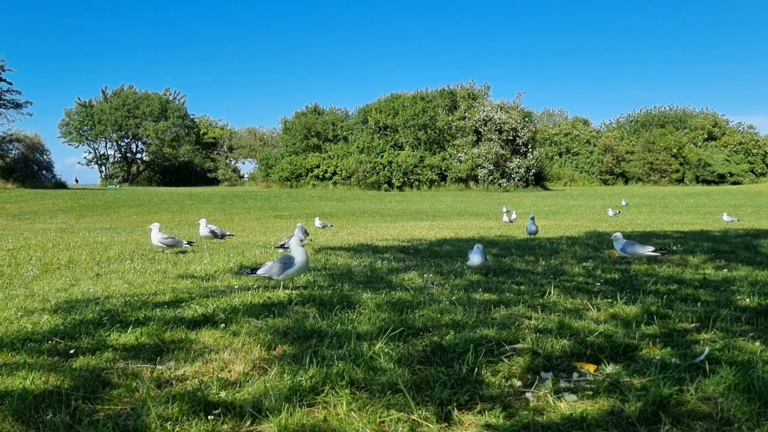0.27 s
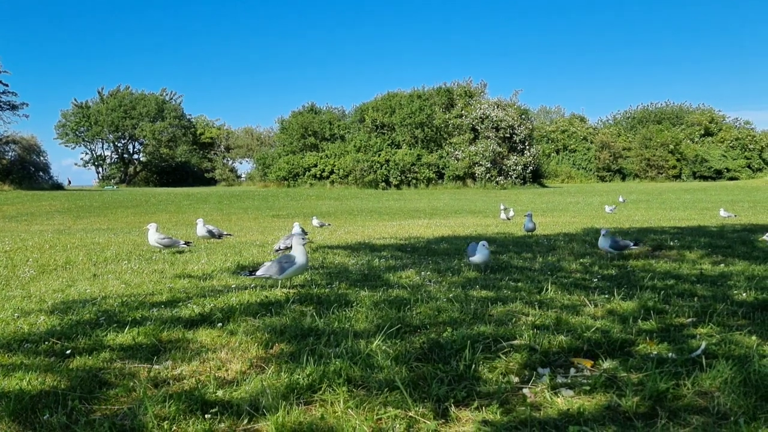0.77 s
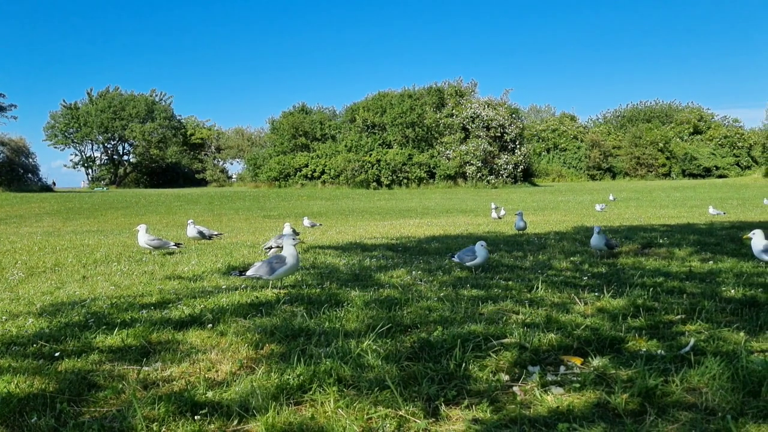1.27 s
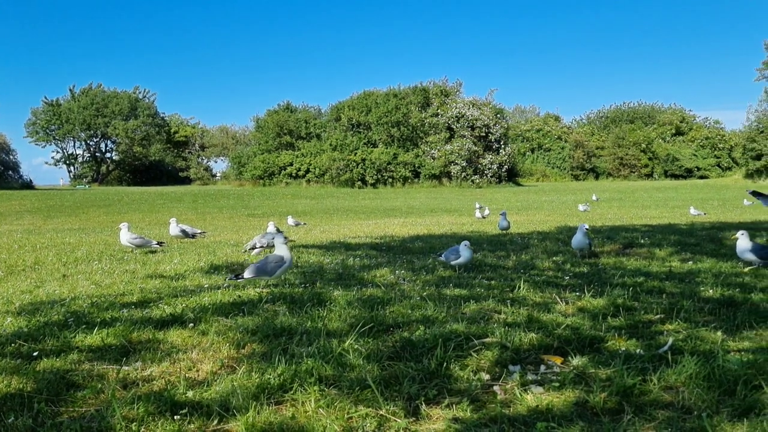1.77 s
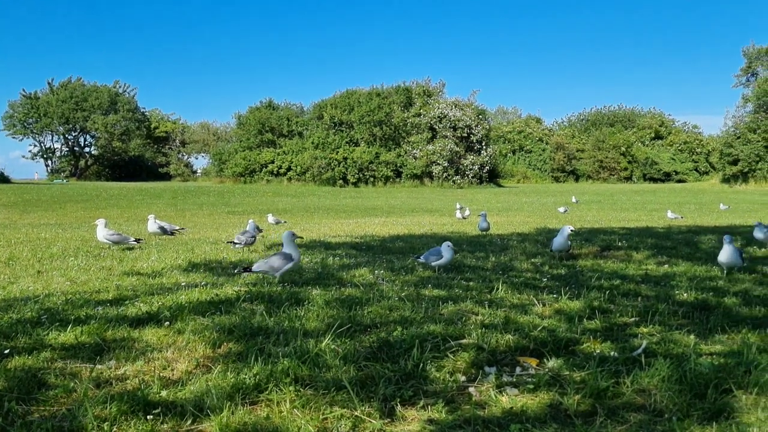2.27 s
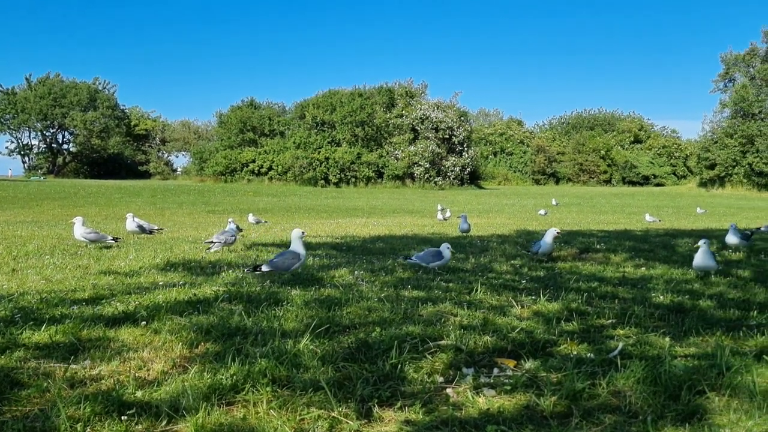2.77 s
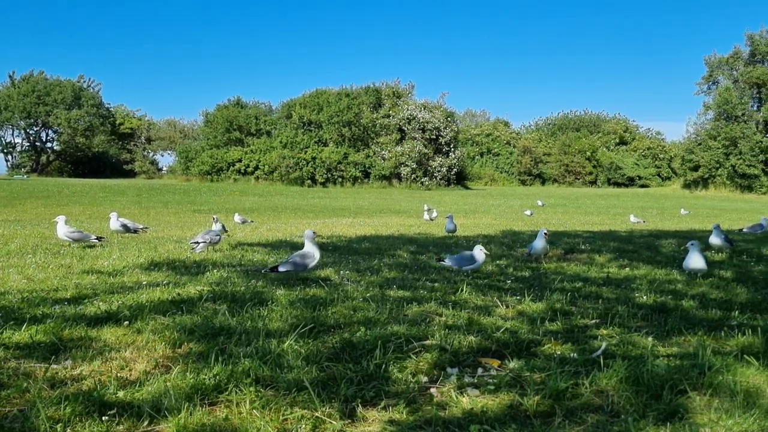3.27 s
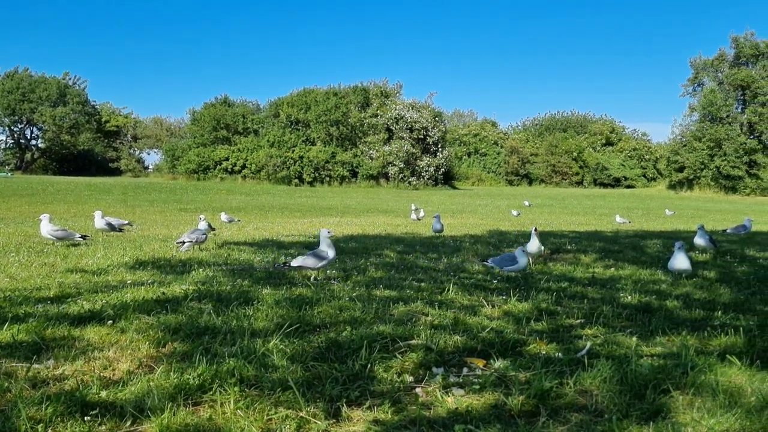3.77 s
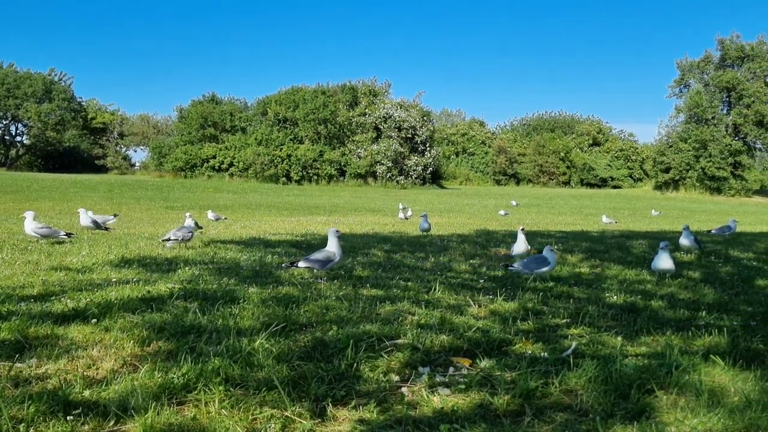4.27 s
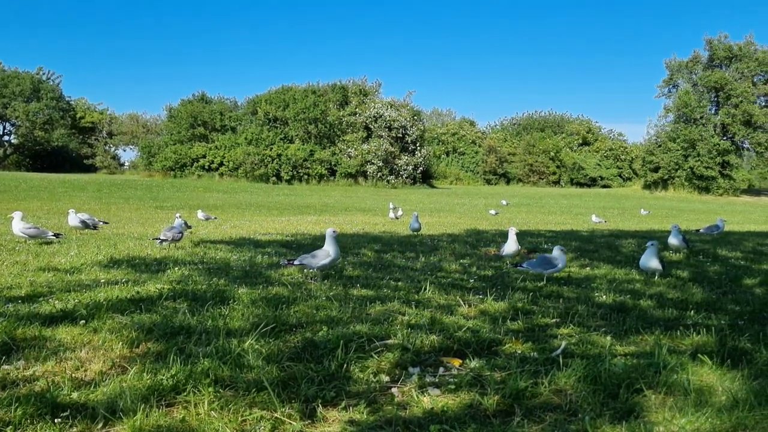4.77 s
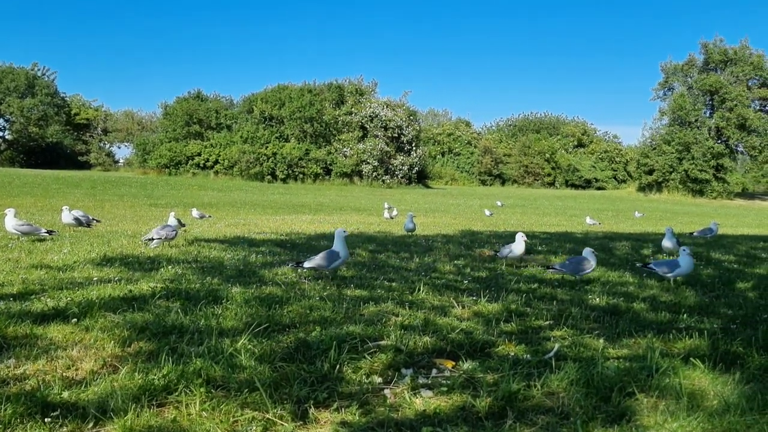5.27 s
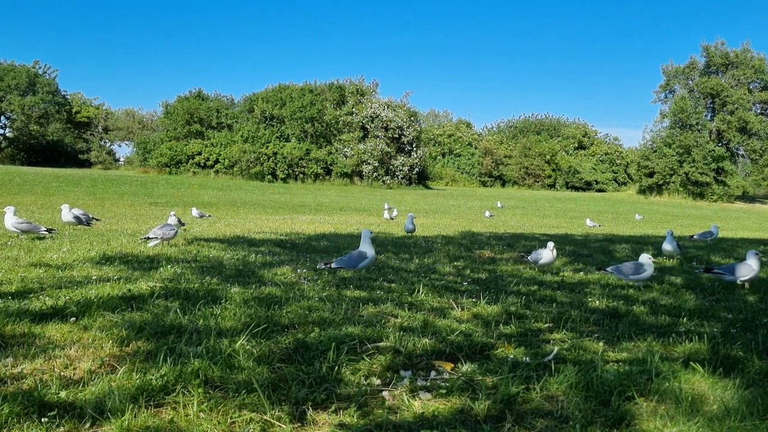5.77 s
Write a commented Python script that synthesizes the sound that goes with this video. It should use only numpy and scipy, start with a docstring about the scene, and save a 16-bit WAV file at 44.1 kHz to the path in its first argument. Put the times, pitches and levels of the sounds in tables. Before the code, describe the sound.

On an open lawn, a gull gives three short yelps. A louder gull close by follows with two long cries that start hoarsely and flip between a clear tone and a shrill high one, then three shorter calls. Other gulls squawk and wail far off, and a small bird twitters faintly near the end. Distant traffic and wind rumble underneath. The microphone hears the birds slightly from the right.

```python
"""Gulls on an open lawn

A near gull gives long cries that flip between registers, another yelps, others squawk and wail far off;
each voice is a vibrating membrane heard through a throat. A far bird croaks, a small one twitters, and
faint snaps sound nearby. Grass, shrubs and a tree line throw the calls back over leaf hiss, faint drones
and a rumble of distant traffic and wind. Two microphone ports a hand apart hear it from the right."""
import sys
import numpy as np
from scipy import signal
from scipy.io import wavfile
from scipy.ndimage import uniform_filter1d

SR = 44100
rng = np.random.default_rng(int(sys.argv[2]) if len(sys.argv) > 2 else 0)


def persist_wave(psi):
    """Save psi, clipped to +-1, as 16-bit WAV."""
    counts = np.round(np.clip(psi, -1, 1) * 32767).astype(np.int16)
    wavfile.write(sys.argv[1], SR, np.atleast_2d(counts).T)


N = 265526
EDGE_HZ = 16000
STEP = 8  # samples per control value


def amp(db):
    """Decibels to gain."""
    return 10 ** (np.asarray(db) / 20)


def unit_rms(x):
    """Scales to rms 1."""
    return x / np.sqrt(np.mean(abs(x) ** 2) + 1e-20)


def spectrum_at(points, hz):
    """Interpolates a spectrum table on a log-frequency axis."""
    table_hz, value = np.transpose(points)
    return np.interp(np.log(hz + 1), np.log(table_hz + 1), value)


def drift(count, width_hz):
    """Narrowband complex noise, rms 1."""
    pole = np.exp(-np.pi * width_hz / SR)
    real, imag = rng.standard_normal((2, count))
    return unit_rms(signal.lfilter([1], [1, -2 * pole, pole * pole], real + 1j * imag))


def held(slow, count):
    """Holds each control value for STEP samples."""
    return np.repeat(slow, STEP, axis=-1)[..., :count]


def port_gains(path, hz, base_lag_ms=0.11):
    """Complex gain at each port: delay, level and a comb that hollows the spectrum, less in the treble."""
    delay_ms, gain_db, lag_factor, comb_depth = np.transpose(path)[:, :, None]
    depth = np.clip(comb_depth, 0, 1) / (1 + (hz / 14100) ** 2)
    phase_per_ms = -2j * np.pi * hz / 1000
    comb = 1 + depth * np.exp(phase_per_ms * base_lag_ms * lag_factor)
    return amp(gain_db) * np.exp(phase_per_ms * delay_ms) * comb


def glide(shape, start_s, length_s, level_db, from_hz, to_hz, *timbre):
    """Voice rows of a note that slides straight between two pitches."""
    return [(start_s + u * length_s, level_db + db, from_hz + u * (to_hz - from_hz), *timbre)
            for u, db in shape]


def voice(calls, throat, path, jitter, shimmer, breath_width_hz, harmonics, doubling=()):
    """Harmonics of a vibrating membrane; throat and path set colour and balance, not overall level."""
    out = np.zeros((2, N))
    for rows in calls:  # time_s, level_db, pitch_hz, breath[, tilt_db_per_oct[, base_lag_ms]]
        time_s, *columns = np.transpose(rows)
        t = np.arange(time_s[0] - .002, time_s[-1] + .0015, 1 / SR)
        columns = [np.interp(t, time_s, column) for column in columns]
        level_db, hz, breath, tilt, lag_ms = columns + [0, .3][len(columns) - 3:]
        hz = uniform_filter1d(hz, size=200) * (1 + jitter * drift(len(t), 75).real)
        turns = np.cumsum(hz) / SR
        controls = hz, np.clip(breath, 0, 1), tilt, lag_ms
        slow_hz, breath, tilt, lag_ms = (np.broadcast_to(c, t.shape)[::STEP] for c in controls)
        cycle, partial = np.exp(2j * np.pi * turns), 1
        sound, power = np.zeros((2, len(t))), 1e-12
        for k in range(1, harmonics + 1):
            if k * hz.min() > EDGE_HZ:
                break
            partial_hz = k * slow_hz
            colour_db = spectrum_at(throat, partial_hz) + tilt * np.log2(np.maximum(partial_hz / 1500, 1))
            in_band = np.clip((EDGE_HZ - partial_hz) / 300, 0, 1)
            sway = abs(1 + (k > 1) * .2 * drift(len(slow_hz), 9 * STEP))  # overtones swell independently
            gain = amp(colour_db) * in_band * port_gains(path, partial_hz, lag_ms) * sway
            power = power + (abs(gain) ** 2).mean(0) / 2
            # moving air makes each partial twinkle, high ones most; breath spreads noise around it
            fray = .4 * (partial_hz / 11000) ** 2
            twinkle = (shimmer + fray) * drift(len(slow_hz), 60 * STEP)
            tone = held(gain * (np.sqrt(1 - breath ** 2) + twinkle), len(t))
            noise = held(gain * (breath + fray ** 2), len(t)) * drift(len(t), breath_width_hz)
            partial = partial * cycle
            sound += ((tone + noise) * partial * np.exp(2j * np.pi * rng.random())).real
        for start_s, end_s, depth_db in doubling:
            sound *= 1 + amp(depth_db) * ((t > start_s) & (t < end_s)) * np.cos(np.pi * turns)
        fade = np.clip(np.minimum(t - t[0], t[-1] - t) / .004, 0, 1)
        sound *= amp(level_db) * fade / held(np.sqrt(power), len(t))
        out[:, round(t[0] * SR):][:, :len(t)] += sound
    return out


# rumble and hiss: freq_hz, relative_density_db
AIR_SPECTRUM = [(12, -57.5), (25, -29), (40, -8.5), (55, -1.5), (70, 3), (95, -3.5), (125, -13.5),
                (185, -7.5), (260, -21), (367, -20), (434, -40.5), (600, -32.5), (1030, -31.5), (1530, -52),
                (2600, -51.5), (6800, -58.5), (8000, -65), (10500, -66), (12500, -65), (16000, -67)]
# port balance: freq_hz, left_minus_right_db
AIR_BALANCE = [(60, -9), (150, 1), (380, -0.5), (950, 1.5), (2380, -2), (5980, -1), (15000, -4)]
# likeness of the ports: freq_hz, coherence
AIR_COHERENCE = [(30, 0), (80, 0.5), (200, .75), (500, 0.1), (1300, 1), (2500, 0.2), (5000, .3), (9000, 0),
                 (15000, .65)]
# swells below and above 250 Hz: time_s, rumble_change_db, roar_change_db
GUSTS = [(0, -5.5, -1, ), (.2, -5.5, 1.5), (.5, .5, -4.5), (.8, -1.5, 0.5), (1.102, -6.5, 1.5),
         (1.4, -3.5, -3.5), (1.801, -1.5, -4.5), (2.4, -5.5, -6), (3.2, -1.5, -3), (4.2, -1, 2.5),
         (4.7, -2.5, -10), (5.3, -2.5, -3), (5.901, -3, 4)]


def traffic_and_wind(level_db=-39.5, left_lag_ms=.54, leaves_db=-3, rustle_db=29.5, rustle_s=.17):
    """Gusting rumble and roar; the leaves rustle at the start, then hiss steadily."""
    frames, hz = N // 256 + 5, np.fft.rfftfreq(2048, 1 / SR)
    t = np.arange(frames) * 256 / SR
    right_re, right_im, own_re, own_im, patches = rng.standard_normal((frames, 1025, 5)).T
    patches = uniform_filter1d(uniform_filter1d(patches, size=16, axis=0), size=12, axis=1)
    rumble_band = 1 / (1 + (hz / 250) ** 4)
    roar_band = (1 - rumble_band) / (1 + (hz / 4000) ** 4)
    leaf_band = 1 / (1 + (4000 / (hz + 1)) ** 4) / (1 + (hz / 10500) ** 8)
    time_s, *gusts = np.transpose(GUSTS)
    gusts_db = [np.interp(t, time_s, gust) for gust in gusts]
    hiss_db = leaves_db + rustle_db * np.clip(1 - t / rustle_s, 0, 1)
    change_db = np.transpose([rumble_band, roar_band, leaf_band]) @ np.array(gusts_db + [hiss_db])
    coherence = np.clip(spectrum_at(AIR_COHERENCE, hz), 0, 1)[:, None]
    delay = np.exp(-2j * np.pi * hz * left_lag_ms / 1000)[:, None]
    right = right_re + 1j * right_im
    left = delay * coherence * right + np.sqrt(1 - coherence ** 2) * (own_re + 1j * own_im)
    balance = amp(np.outer([.5, -.5], spectrum_at(AIR_BALANCE, hz)))[:, :, None]
    colour = amp(spectrum_at(AIR_SPECTRUM, hz)[:, None] + change_db + 2.1 * unit_rms(patches))
    _, noise = signal.istft(np.array([left, right]) * balance * colour, nperseg=2048, noverlap=1792)
    return amp(level_db) * unit_rms(noise[:, :N])


# drones and wails to the left, right port: delay_ms, gain_db, lag_factor, comb_depth
FAR_RIGHT_PATH = [(0.41, 1.3, 1.7, 0.3), (0.021, -5, 0.99, 0.034)]
# faint far tones: pitch_hz, width_hz, source_db
DRONES = [(68.9, 9.6, -49.5), (503, 57, -66), (1094, 4.5, -67.5)]


def drones():
    """Narrow wavering tones from the far right."""
    t = np.arange(N) / SR
    return sum(amp(db) * drift(N, width_hz) * np.exp(2j * np.pi * hz * t) * port_gains(FAR_RIGHT_PATH, hz)
               for hz, width_hz, db in DRONES).real


# squawks, croak and twitter to the left, right port: delay_ms, relative_db, lag_factor, comb_depth
FAR_BIRD_PATH = [(0.694, 0.9, 2.5, .1), (0.14, -0.9, 1, 0.093)]
# throat resonances: freq_hz, relative_db
SQUAWK_THROAT = [(500, -22), (950, 3), (1400, -19), (2100, -2), (2600, 0), (3000, -1.5), (3900, -3),
                 (4700, -22), (8000, -55)]
# far calls: breath, tilt_db_per_oct, [(time_s, level_db, pitch_hz)]
SQUAWKS = [ (.15, 3, [(.113, -60, 952), (.124, -51, 1034), (.14, -48.5, 927), (.158, -56, 853)]),
           (.35, -10, [(.16, -58, 747), (.185, -55, 697), (.215, -61.5, 651), (.3, -70, 608)]),
           (.75, -5, [(5.52, -63, 710), (5.56, -54, 604), (5.61, -60, 550), (5.66, -70, 492),
           (5.7, -74, 448)]), ]


def squawks():
    """Hoarse falling calls far off."""
    calls = [[(*row, breath, tilt) for row in rows] for breath, tilt, rows in SQUAWKS]
    return voice(calls, SQUAWK_THROAT, FAR_BIRD_PATH,
                 jitter=.004, shimmer=.25, breath_width_hz=300, harmonics=8)


def raspy_whistle(calls):
    """A far bird's single partial, roughened by breath."""
    flat_throat = [(2000, 0), (9000, 0)]
    return voice(calls, flat_throat, FAR_BIRD_PATH,
                 jitter=.0049, shimmer=.22, breath_width_hz=320, harmonics=1)


# hoarse far bird: time_s, level_db, pitch_hz, breath
CROAK = [(.41, -78, 1610, .85), (.52, -60.5, 1573, 0.87), (.75, -65, 1620, .97), (.88, -68, 1533, 0.8)]


def croak():
    """One long note, more breath than tone."""
    return raspy_whistle([CROAK])


# throat resonances: freq_hz, relative_db
YELP_THROAT = [(450, -12.5), (800, -14), (1500, 0.5), (2000, -9.5), (2500, -15), (3400, -8.5), (4200, -6.5),
               (5500, -4.5), (6300, -18.5), (7200, -18), (9000, -32), (16000, -44.5)]
# to the left, right port: delay_ms, relative_db, lag_factor, comb_depth
YELP_PATH = [(0.4, 0.66, 1.167, 0.65), (0.078, -3.1, 0.92, 0.76)]
# short calls: start_s, length_s, top_db, top_hz, low_register_share, tilt_db_per_oct, base_lag_ms
YELPS = [(0.597, 0.12, -34, 856.5, .44, -3, 0.71), (0.879, 0.13, -36.5, 659.4, 0, 0, 0.5),
         (1.158, 0.13, -37, 671, 0, -.5, 0.513), (2.303, 0.12, -32.5, 800, 0.1, -4, 0.51)]


def yelps(peak_share=.61, low_register_ratio=.72, breath=.18):
    """Pitch, level and brightness share one round arch; a yelp may start in a lower register."""
    u = np.linspace(0, 1, num=60)
    before = np.clip(1 - u / peak_share, 0, 1) ** 2
    after = np.clip((u - peak_share) / (1 - peak_share), 0, 1) ** 2
    pitch_sag = .33 * before + .26 * after
    level_sag_db = 9.7 * before + 14 * after
    tilt_sag = 8 * before + 5 * after
    calls = []
    for start_s, length_s, top_db, top_hz, low_share, tilt, lag_ms in YELPS:
        hz = top_hz * (1 - pitch_sag) * np.where(u < low_share, low_register_ratio, 1)
        columns = start_s + u * length_s, top_db - level_sag_db, hz, breath, tilt - tilt_sag, lag_ms
        calls.append(np.transpose(np.broadcast_arrays(*columns)))
    return voice(calls, YELP_THROAT, YELP_PATH,
                 jitter=.003, shimmer=.25, breath_width_hz=400, harmonics=30)


# throat resonances: freq_hz, relative_db
WAIL_THROAT = [(500, -27), (1100, -2), (1800, 5.5), (2400, -21.5), (3000, -7), (3600, -31), (8000, -59)]
# far gulls: breath, tilt_db_per_oct, [(time_s, level_db, pitch_hz)]
WAILS = [ (.1, -62, [(1.3, -72.5, 1076), (1.39, -60.5, 1050), (1.46, -57, 1046), (1.5, -58, 1000),
         (1.53, -55.5, 915)]), (0.24, 1, [(2.63, -49, 478), (2.711, -50.5, 557), (2.751, -52.5, 606),
         (2.799, -53, 590), (2.895, -55, 614.7), (3.0, -47.5, 568.7), (3.24, -47, 554), (3.37, -50, 551.6),
         (3.47, -55, 533), (3.62, -55, 500)]), (0.096, -31, [(3.68, -57, 912), (3.801, -44.5, 1064),
         (3.845, -51, 1270), (3.869, -50.5, 1302), (3.933, -42, 1057), (4.049, -43.5, 1024),
         (4.121, -44, 1124), (4.185, -51, 997), (4.24, -64, 906)]), (.08, 23, [(5.05, -60, 583),
         (5.11, -64, 549), (5.125, -70, 601), (5.18, -56, 563.5), (5.25, -68, 571), (5.36, -70.5, 537)]),
         (0.18, 3, [(5.81, -72.5, 996), (5.83, -62.5, 1004), (5.86, -81, 960)]), ]


def wails():
    """Wavering, slightly breathy calls of far gulls."""
    calls = [[(*row, breath, tilt) for row in rows] for breath, tilt, rows in WAILS]
    return voice(calls, WAIL_THROAT, FAR_RIGHT_PATH,
                 jitter=.002, shimmer=.16, breath_width_hz=300, harmonics=8)


# small snaps nearby: start_s, peak_db, pitch_hz, width_hz, left_minus_right_db
SNAPS = [(1.3662, -49, 7200, 1770, 5), (4.6564, -40.5, 3001, 1800, 10), (4.6902, -55, 3535, 1809, -2),
         (4.751, -45, 4360, 1790, -4), (5.9494, -62.5, 5990, 1800, 1)]


def snaps():
    """Each snap is a short damped ring."""
    out, t = np.zeros((2, N)), np.arange(400) / SR
    for start_s, peak_db, hz, width_hz, pan_db in SNAPS:
        ring = np.sin(2 * np.pi * hz * t) * np.exp(-np.pi * width_hz * t)
        gains = amp(peak_db + np.array([[.5], [-.5]]) * pan_db)
        out[:, round(start_s * SR):][:, :len(t)] += gains * ring / ring.max()
    return out


# throat resonances: freq_hz, relative_db
CRY_THROAT = [(450, -12), (900, -16.5), (1600, 4), (2300, -8), (2900, -2.5), (3600, -8.5), (4200, -1.5),
              (5500, -6.5), (6300, -15.5), (7300, -22.5), (8500, -32), (11400, -34), (13000, -40.5),
              (16000, -41.5)]
# to the left, right port: delay_ms, relative_db, lag_factor, comb_depth
CRY_PATH = [(0.3363, 21, 1.051, 0.53), (0.041, 18.5, 0.915, 0.39)]
# hoarse openings: start_s, length_s, level_db, from_hz, to_hz, tilt_db_per_oct
CRY_SCOOPS = [(1.542, 0.044, -32.5, 592.7, 712, 3), (2.915, 0.034, -29.5, 519.6, 749, -0.3),
              (3.744, 0.032, -30, 559, 737, -1.5), (4.283, .04, -27, 500, 603, 1.5),
              (4.825, 0.064, -30.5, 417.4, 720, -1)]
# clear registers: base_tilt_db_per_oct (from, to), base_lag_ms (from, to), [(time_s, level_db, pitch_hz)]
CRY_REGISTERS = [ ((3.5, 4.3), (.47, .55), [(1.582, -24, 776), (1.617, -24.5, 831), (1.626, -30.5, 867)]),
                 ((4.9, 5), (.54, .42), [(1.628, -26.5, 942), (1.725, -21.5, 1034), (1.75, -25.5, 1078),
                 (1.777, -27, 1096), (1.796, -38.5, 1137)]), ((0.85, 1.5), (0.558, 0.592),
                 [(1.798, -22.5, 2835), (1.827, -22, 2810), (2.019, -22, 2740), (2.039, -23, 2703),
                 (2.079, -22.5, 2695), (2.115, -18, 2574), (2.175, -20, 2532), (2.216, -21.5, 2488)]),
                 ((8, 5.1), (0.49, 0.474), [(2.218, -22, 1151), (2.275, -21.5, 1144), (2.33, -22, 1129),
                 (2.346, -28, 1068)]), ((2.64, 0.59), (0.53, .5), [(2.348, -24, 1010), (2.453, -24, 977),
                 (2.493, -25, 923), (2.517, -31.5, 879), (2.589, -26, 836), (2.62, -29.5, 759)]),
                 ((1.1, 5.7), (.54, .43), [(2.952, -25, 923), (2.997, -22.5, 1029), (3.037, -21, 1061),
                 (3.073, -26.5, 1108), (3.093, -31, 1152)]), ((3.4, 0.76), (0.57, 0.59),
                 [(3.095, -21.5, 2854), (3.16, -18.5, 2882), (3.27, -19, 2885), (3.364, -19, 2858),
                 (3.396, -21, 2801), (3.42, -24, 2670), (3.46, -18.5, 2570), (3.484, -19.5, 2550)]),
                 ((3.9, 1.7), (0.3964, 0.39), [(3.486, -19, 1167), (3.575, -25.5, 1115),
                 (3.592, -31.5, 1117), (3.6, -16, 1035)]), ((0, -1.6), (0.62, .55), [(3.78, -21, 965),
                 (3.805, -29, 1003), (3.821, -22.5, 1004), (3.838, -38.5, 964)]), ((1, -6), (0.33, 0.375),
                 [(3.84, -27.5, 2380), (3.865, -24.5, 2423), (3.917, -23, 2436), (3.941, -20.5, 2280),
                 (3.974, -20.5, 2132)]), ((-1.5, 0), (0.666, 0.639), [(3.976, -19.5, 906.6),
                 (4.037, -20, 902.8), (4.089, -20.5, 894), (4.105, -28.5, 834)]), ((1, 1), (0.682, 0.56),
                 [(4.325, -23, 902), (4.35, -19.5, 932), (4.394, -23, 990), (4.416, -36, 1033)]), ((1, 4.7),
                 (0.612, 0.736), [(4.418, -34, 998), (4.44, -30, 956), (4.458, -20, 925.5),
                 (4.522, -26.5, 841), (4.56, -33.5, 705)]), ((3.8, 0.5), (0.61, 0.84), [(4.895, -26.5, 843),
                 (4.91, -27.5, 849), (4.93, -27, 821), (4.944, -32, 760), (4.983, -34, 697)]), ]
# hoarse endings: start_s, length_s, level_db, from_hz, to_hz, tilt_db_per_oct
CRY_DROPS = [(2.623, .038, -31, 629, 505, 3.5), (3.602, 0.035, -25, 561, 466, 1.5),
             (4.106, 0.018, -29, 541, 487.4, 3.5), (4.562, .038, -32.5, 529, 412, 1),
             (4.985, 0.086, -35.5, 522, 426.6, -5)]
# strong and weak cycles alternate: start_s, end_s, depth_db
PERIOD_DOUBLING = [(2.24, 2.345, -18), (3.495, 3.6, -16.5)]


def long_cries(clear_breath=.0043, hoarse_breath=.54, hoarse_lag_ms=.58):
    """The near gull scoops up hoarsely, jumps between clear registers, then drops hoarsely."""
    calls = []
    for tilt_ends, lag_ends, rows in CRY_REGISTERS:
        time_s, level_db, hz = np.transpose(rows)
        # the lag tunes a comb of windpipe resonances that hollows the overtones and shifts between calls
        tilt, lag_ms = (np.interp(time_s, time_s[[0, -1]], ends) for ends in (tilt_ends, lag_ends))
        tilt += .32 * (level_db + 25)  # louder is brighter
        calls.append(np.transpose(np.broadcast_arrays(time_s, level_db, hz, clear_breath, tilt, lag_ms)))
    swell, decay = [(0, -12), (.45, -5), (1, 0)], [(0, -1), (.4, -2), (.998, -19)]  # length_share, gain_db
    for shape, notes in (swell, CRY_SCOOPS), (decay, CRY_DROPS):
        calls += [glide(shape, *note, hoarse_breath, tilt, hoarse_lag_ms) for *note, tilt in notes]
    return voice(calls, CRY_THROAT, CRY_PATH,
                 jitter=.0007, shimmer=.06, breath_width_hz=350, harmonics=34, doubling=PERIOD_DOUBLING)


# small bird's notes: start_s, length_s, level_db, from_hz, to_hz, breath
TWITTER = [(4.62, 0.042, -50.5, 3146, 3540, 0.47), (4.734, 0.08, -51, 4314, 3950, 0.65),
           (5.071, 0.088, -54.5, 4070, 3830, 0.94), (5.209, 0.042, -58, 3950, 3560, 0.86),
           (5.223, 0.045, -49.5, 3465, 2720, 0.2), (5.256, 0.037, -48, 2714, 3360, 0.56),
           (5.338, 0.074, -70.5, 6600, 6650, 0.45), (5.39, 0.059, -67.5, 6200, 6230, 0.7),
           (5.443, 0.027, -61.5, 4160, 3480, .9), (5.466, 0.034, -47.5, 3460, 3180, 0.35),
           (5.582, 0.059, -74, 5410, 5440, 0.76)]


def twitter():
    """Quick high glides, each swelling and fading."""
    arch = [(0, -2.5), (.35, 2.5), (.7, .5), (1, -3)]  # length_share, gain_db
    return raspy_whistle([glide(arch, *note) for note in TWITTER])


def lawn_echoes(calls, scatter_db, scatter_t60_s, wash_db, wash_t60_s, trees_db, trees_s):
    """Scatter from grass and shrubs, a long faint wash, and one echo from the tree line."""
    t = np.arange(SR) / SR
    taps = np.zeros((2, SR))
    tap_at = np.arange(200, SR - 20, 20) + rng.integers(0, 20, (2, (SR - 201) // 20))
    np.put_along_axis(taps, tap_at, rng.choice([-1., 1.], tap_at.shape), 1)
    shapes = amp(-60 * t / scatter_t60_s), amp(-60 * t / wash_t60_s), np.exp(-((t - trees_s) / .004) ** 2)
    scatter, wash, trees = (taps * shape / np.linalg.norm(taps[0] * shape) for shape in shapes)
    lowpass = signal.butter(3, 3800, fs=SR)  # distance takes the treble
    distant = signal.lfilter(*lowpass, amp(wash_db) * wash + amp(trees_db) * trees)
    return signal.fftconvolve(calls, amp(scatter_db) * scatter + distant, axes=1)[:, :N]


def scene():
    """Near and far sounds echo across the lawn; traffic, wind and drones lie under them."""
    near = long_cries() + yelps() + snaps()
    far = wails() + squawks() + twitter() + croak()
    echoes = lawn_echoes(near, scatter_db=-13, scatter_t60_s=.21, wash_db=-34, wash_t60_s=3.3,
                         trees_db=-42.5, trees_s=.232)
    echoes += lawn_echoes(far, scatter_db=-6, scatter_t60_s=.067, wash_db=-14.5, wash_t60_s=.7,
                          trees_db=-31, trees_s=.078)
    return near + far + echoes + traffic_and_wind() + drones()


def record(dry):
    """A short silence, quick fades in and out, and the band limit."""
    t = np.arange(N) / SR
    fade_in = np.clip((t - .032) / .0092, 0, 1)
    fade_out = np.clip(t[::-1] / .004, 0, 1)
    padded = np.pad(dry * fade_in * fade_out, ((0, 0), (255, 255)), "reflect")
    lowpass = signal.firwin(511, EDGE_HZ, window=("kaiser", 9), fs=SR)
    return signal.oaconvolve(padded, lowpass[None], "valid", axes=1)


dry = scene()
out = record(dry)
persist_wave(out)
```